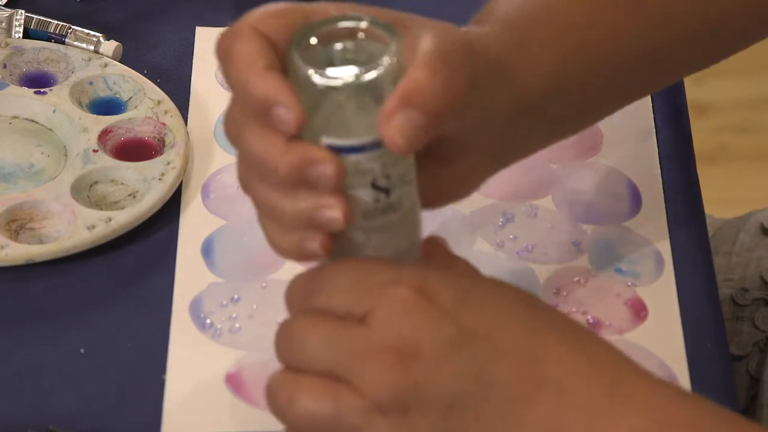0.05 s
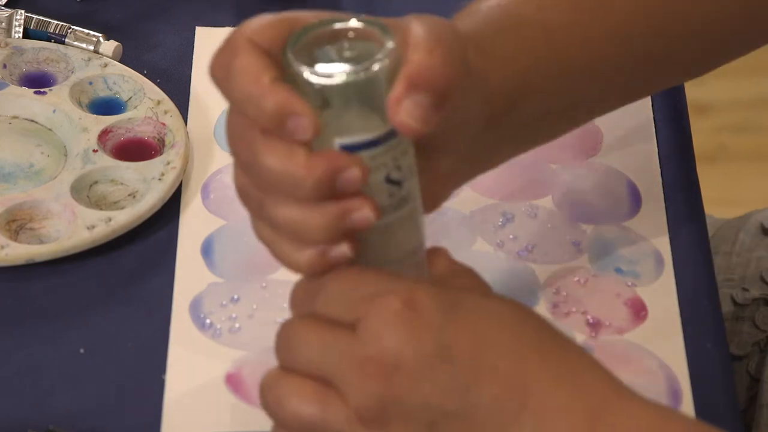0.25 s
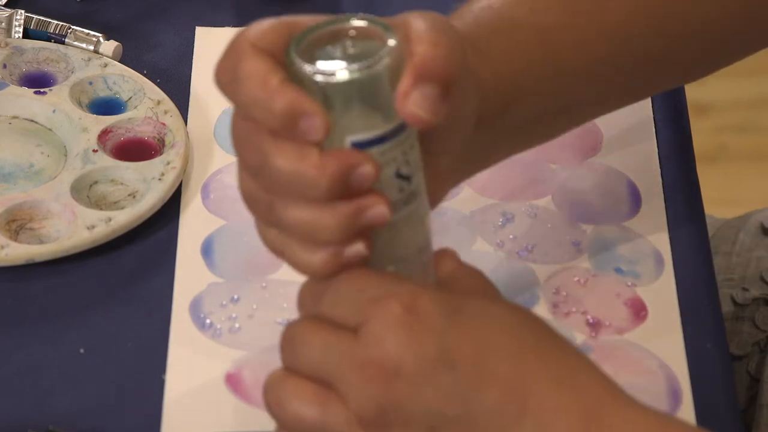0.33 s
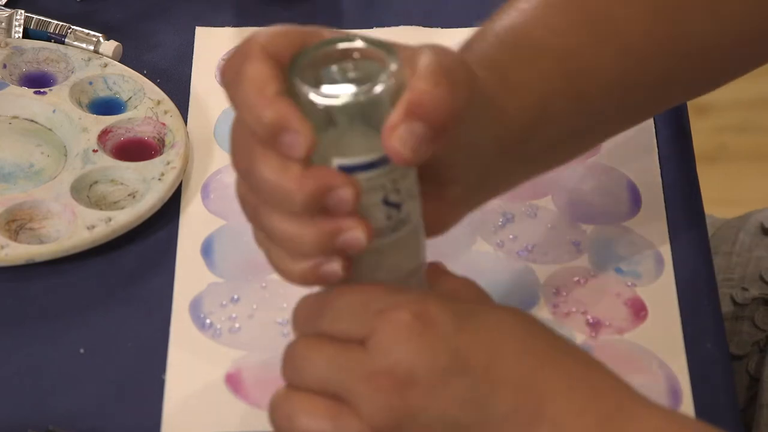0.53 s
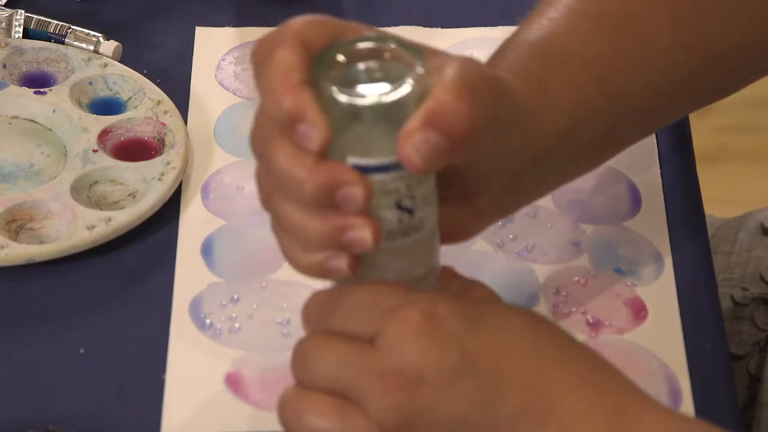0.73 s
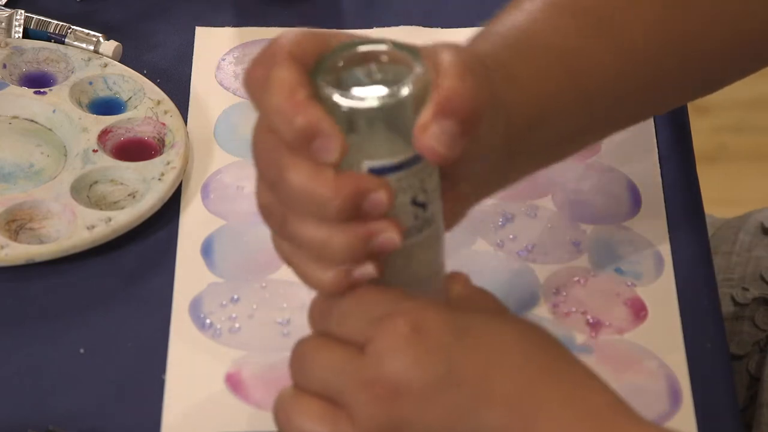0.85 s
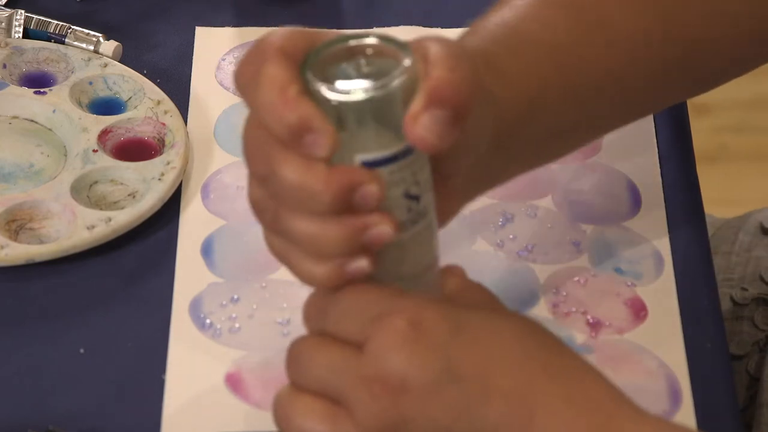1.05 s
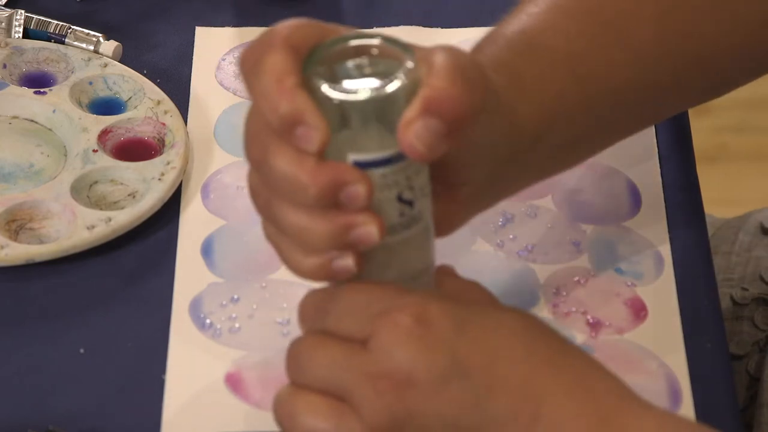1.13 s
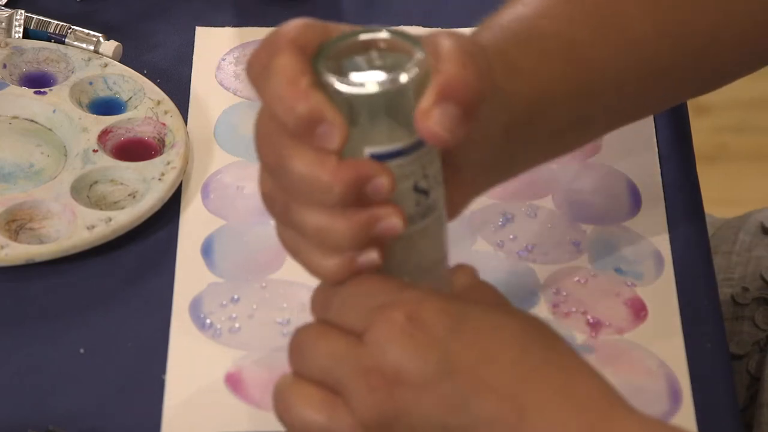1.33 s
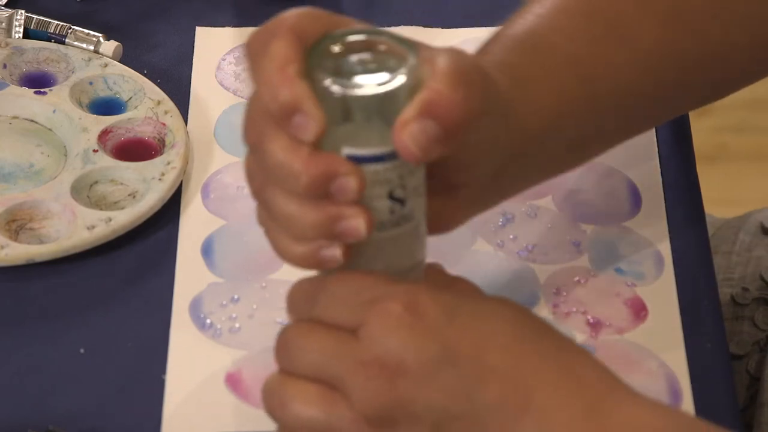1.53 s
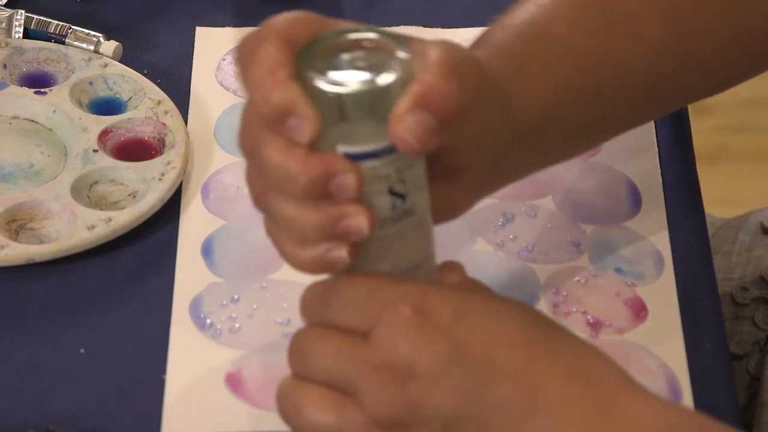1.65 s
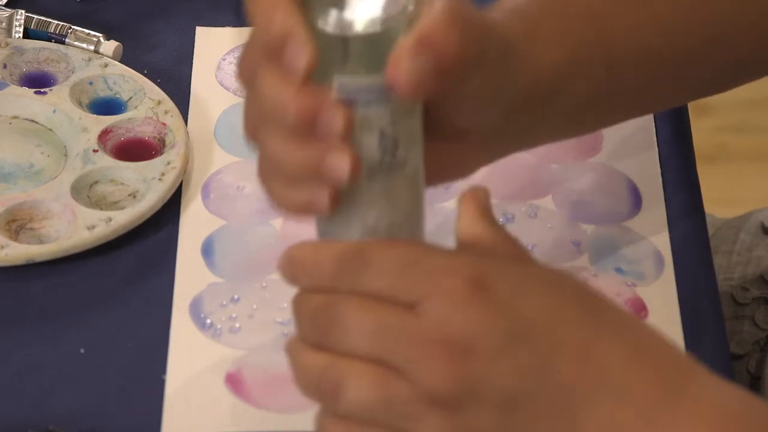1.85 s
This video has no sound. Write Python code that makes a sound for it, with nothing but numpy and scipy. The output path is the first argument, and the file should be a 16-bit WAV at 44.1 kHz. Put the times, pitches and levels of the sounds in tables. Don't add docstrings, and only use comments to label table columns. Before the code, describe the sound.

Salt crystals crack sharply in five twists of a hand-held grinder, each trailing a soft hiss

```python
import sys
import numpy as np
from scipy import signal
from scipy.fft import rfft, irfft
from scipy.io import wavfile
from scipy.ndimage import uniform_filter1d

SR = 44100
rng = np.random.default_rng(int(sys.argv[2]) if len(sys.argv) > 2 else 0)


def nominal_scale(level):
    x = np.asarray(level, float) / 20
    return 10 ** x


def materialize(psi):
    bounded = np.clip(np.atleast_2d(psi).T, -1, 1)
    quanta = np.round(bounded * 32767).astype(np.int16)
    wavfile.write(sys.argv[1], SR, quanta)


N = 83790


def evened(x):
    return x / np.sqrt(np.mean(x ** 2) + 1e-20)


def read(points, hz):
    table_hz, value = np.transpose(points)
    return np.interp(np.log(hz + 1), np.log(table_hz + 1), value)


def add(mix, start_s, sound):
    part = mix[round(start_s * SR):][:len(sound)]
    part += sound[:len(part)]


def ring(x, hz, width_hz):
    radius = np.exp(-np.pi * width_hz / SR)
    pole = radius * np.exp(2j * np.pi * hz / SR)
    return 2 * signal.lfilter([1 - radius], [1, -pole], x).real


def ring_twice(x, hz, width_hz):
    return evened(ring(ring(x, hz, width_hz), hz, width_hz))


# frequency in Hz, width in Hz, level in dB.
TUBE_MODES = [(2150, 700, -8), (3300, 900, -7), (4700, 900, -4), (6000, 900, -7), (7050, 900, -8),
              (8140, 800, -4), (10200, 600, -.5), (12600, 900, -3), (14800, 900, -8)]


def crack(peak_db, hz, length_s, body_db, wall_db, chance):
    own_db, own_q, splinter_db = -3, 6, 2
    focus_db, focus_octaves = -6, 1.1
    t = np.arange(len(chance)) / SR
    splinters = chance[:, 0] * nominal_scale(splinter_db * np.repeat(chance[::20, 1], 20))
    burst = splinters * np.minimum(t / 0.0005, 1) * np.exp(-(t / length_s) ** 1.2)

    out = nominal_scale(own_db) * ring_twice(burst, hz, hz / own_q + 900)
    for mode_hz, width_hz, mode_db in TUBE_MODES:
        distance = (np.log2(mode_hz / hz) / focus_octaves) ** 2
        distance = min(distance, 4 if mode_hz > hz else 3.2)
        out += nominal_scale(mode_db + focus_db * distance) * ring_twice(burst, mode_hz, 2 * width_hz)

    out = evened(out)
    out += nominal_scale(body_db) * ring_twice(burst, 800, 1400)
    out += nominal_scale(wall_db) * ring_twice(burst, 2500, 1700)
    return nominal_scale(peak_db - 6) * evened(out) * np.sqrt((length_s + 0.0004) / t[-1])


# peak in dB, brightest Hz, length in seconds, dull body in dB, wall ring in dB.
CRACKS = [(-13.5, 11800, 0.0016, -11, -4), (-12, 11500, 0.0017, -17.5, -10), (-19, 5900, 0.00042, 3, 1),
          (-9, 7700, 0.0011, -10.5, -11), (-16.5, 8800, .0009, -29, -5.5), (-22, 12000, 0.00087, -31, -8),
          (-13, 9900, 0.00085, -28, -19), (-14, 11000, 0.00091, -31, -29), (-24, 12500, 0.0011, -24, -17),
          (-20, 9000, 0.0018, -31, -18), (-12, 9800, 0.0011, -31, -48), (-13.5, 4600, 0.0011, -21, -14),
          (-17.5, 11800, .0015, -34, -18.5), (-20.5, 4270, 0.00081, -19, -18),
          (-20.5, 4700, 0.00099, -19, -13), (-20, 11000, 0.0024, -26, -18),
          (-18.5, 5020, 0.00072, -5.5, -9.5), (-21, 9100, 0.00097, -3, -3.5),
          (-18.5, 7000, 0.00081, -35, -16), (-15.5, 4950, 0.0011, -27, -19.5),
          (-21.5, 4700, 0.0009, -26, -25), (-15, 9300, 0.0011, -5.5, -15), (-9, 8000, 0.00084, -10, -27),
          (-13.5, 11500, .001, -25, -42)]
CRACK_S = [0.2136, 0.2553, 0.2603, 0.2643, 0.2849, 0.3046, 0.5531, 0.5568, 0.5923, 0.596, 0.5986, 0.6044,
           0.9049, 0.9359, 0.9954, 1.1233, 1.153, 1.1647, 1.1901, 1.1978, 1.5709, 1.5888, 1.5911, 1.6027]
# peak in dB, brightest Hz.
CHIPS = [(-47, 11800), (-27.5, 4170), (-38, 13000), (-33, 9700), (-31, 5200), (-24.5, 7100), (-22, 3000),
         (-25, 10400), (-29.5, 3300), (-30, 8000), (-39, 2400), (-26, 9200), (-24, 2800), (-33.5, 1630),
         (-41, 7600), (-30.5, 2800), (-29.5, 2050), (-15.5, 10300), (-32, 10200), (-31, 3400), (-39, 9900),
         (-43, 4100), (-36, 15100), (-33, 3600), (-29, 10000), (-33, 4500), (-22.5, 8400),
              (-31, 10400), (-32.5, 3600), (-44, 3200), (-27, 3660), (-30, 1700), (-49, 7100),
              (-30.5, 4700), (-38, 8000), (-28.5, 1500), (-36, 4600), (-27, 4140), (-34.5, 2600),
              (-27.5, 2900), (-37, 9200), (-23, 10500),
         (-29, 1970), (-38, 12000), (-51, 12000), (-40, 3300), (-43, 3700), (-33, 11500), (-38, 11000),
         (-40, 7500), (-31, 3400), (-47, 2600), (-41, 2200), (-48, 2930), (-27.5, 2000), (-35, 10200),
         (-46, 12700), (-33, 9500), (-18, 13600), (-21, 5800), (-21.5, 3200), (-27, 14000), (-29, 3700),
         (-22, 8600), (-22.5, 12500), (-23, 10200), (-21.5, 1300), (-20, 4700)]
CHIP_S = [0.1, 0.1212, 0.1571, 0.1724, 0.223, 0.2525, 0.277, 0.2802, 0.298, 0.3105, 0.3398, 0.3456, 0.3539,
          0.3796, 0.4188, 0.5012, 0.5135, 0.5541, 0.6114, 0.6346, 0.8311]
LATE_CHIP_S = [0.8417, 0.9625, 0.9716, 0.9804, 0.9838, 0.9889, 0.9916, 1.014, 1.0983, 1.109, 1.1286, 1.2238,
               1.2367, 1.283, 1.3607, 1.3687, 1.5316, 1.5402, 1.5454, 1.554, 1.5997]
MORE_CHIP_S = [.1213, .1283, .14, .1685, .21, .2495, .5805, .917, .9238, .9265, .943, .9456, 1.5317, 1.539,
               1.5755, 1.617, 1.199, .2142, .285, .354, .9052, .9362, .9958, 1.1535, 1.589, 1.5902]


def crystals():
    fizz_db, fizz_s = -24.5, 0.0025
    wash_db, wash_t60_s = -18, 0.061
    chip_length_s, chip_body_db, chip_wall_db = 0.0008, -22, -25

    breaks = [(s, *row) for s, row in zip(CRACK_S, CRACKS)]
    small_s = CHIP_S + LATE_CHIP_S + MORE_CHIP_S
    for s, row in zip(small_s, CHIPS):
        breaks.append((s, *row, chip_length_s, chip_body_db, chip_wall_db))
    out = np.zeros(N)
    for start_s, *settings in breaks:
        chance = rng.standard_normal((600, 2))
        add(out, start_s - 0.0003, crack(*settings, chance))

    t = np.arange(8000) / SR
    fizz = rng.standard_normal(800) * np.exp(-t[799::-1] / fizz_s)
    fizz /= np.linalg.norm(fizz)
    out = out + nominal_scale(fizz_db) * signal.fftconvolve(out, fizz)[799:]
    wash = rng.standard_normal(8000) * nominal_scale(-60 * t / wash_t60_s) * np.minimum(t / 0.00083, 1)
    wash /= np.linalg.norm(wash)
    return out + nominal_scale(wash_db) * signal.fftconvolve(out, wash)[:N]


# start in seconds, level in dB, recoil share.
JOLTS = [(.121, -39, 0), (.2135, -22, .45), (.255, -22, .5), (.264, -26, .9), (.279, -36, 0),
         (.285, -36, 0), (.353, -44, 0), (.553, -25, 0), (.592, -31, 0), (.598, -29, 0), (.604, -34, 0),
         (.905, -30, .3), (.9355, -35, 0), (.9955, -39, .7), (1.123, -32, .2), (1.153, -32, .2),
         (1.165, -44, .8), (1.19, -33, 0), (1.198, -29, 0), (1.531, -44, .1), (1.571, -38, 0),
         (1.5888, -19.5, .9), (1.6025, -44, 1)]


def jolts():
    recoil_s, push_s, low_cut_hz = 0.0011, 0.012, 22
    back = np.arange(0, recoil_s, 1 / SR) / recoil_s
    fore = np.arange(0, push_s, 1 / SR) / push_s
    out = np.zeros(N)
    for start_s, db, recoil in JOLTS:
        sharpness = 0.66 - 0.32 * min(2 * recoil, 1)
        pull = -recoil * np.sin(np.pi * back)
        push = np.sin(np.pi * fore ** sharpness) ** 2
        add(out, start_s, nominal_scale(db) * np.r_[pull, push])
    return signal.sosfilt(signal.butter(4, low_cut_hz, "high", fs=SR, output="sos"), out)


def hiss(gain, patch_db):
    frames = N // 64 + 5
    real, imag, patches = rng.standard_normal((frames, 129, 3)).T
    patches = evened(uniform_filter1d(uniform_filter1d(patches, 10, 0), 6, 1))
    hz = np.fft.rfftfreq(256, 1 / SR)[:, None]
    t = np.arange(frames) * 64 / SR
    z = (real + 1j * imag) * nominal_scale(patch_db * patches) * gain(hz, t)
    return signal.istft(z, nperseg=256, noverlap=192)[1][:N]


# start in seconds, level in dB, rise in seconds, t60 in seconds, low band in dB.
SLIDES = [(.12, -47.5, 0.043, 1.1, 5.5), (.213, -40.5, 0.0042, 0.46, 10), (.262, -36.5, 0.013, 2.03, 2),
          (.339, -44, 0.048, 1.1, 6), (.555, -45, .0078, 2.1, 7), (.6, -40, 0.014, 1.9, -3.5),
          (.88, -44, 0.012, 0.7, 0), (.905, -46, .0059, 1.3, -4), (.975, -45, .0073, 1.6, 1),
          (1.125, -43.5, 0.013, 2, 2), (1.158, -53, .0056, 1.1, 2), (1.2, -42, 0.03, 1.46, 4),
          (1.36, -40.5, 0.0062, 0.31, -12), (1.534, -40, .0087, .3, 3), (1.552, -42, 0.0037, .1, 4),
          (1.606, -35.5, .014, 1.83, -7.5)]
# frequency in Hz, level in dB per Hz.
SLIDE_SPECTRUM = [(880, -13.5), (1500, -12), (1540, -12.5), (2310, -10), (2570, -11), (2780, -6.5),
                  (5290, -3.5), (11800, -3.5), (15500, -4)]
# frequency in Hz, share of t60.
DECAY_SHARE = [(1000, 1.32), (5000, 0.77), (10000, 0.54), (16000, 0.15)]


def slides():
    low_band_hz = 3435

    def gain(hz, t):
        power = 0
        for start_s, db, rise_s, t60_s, low_db in SLIDES:
            swell = np.clip((t - start_s) / rise_s, 0, 1) ** 2
            tilt_db = low_db / (1 + (hz / low_band_hz) ** 10)
            decay_db = 60 * np.maximum(t - start_s, 0) / (t60_s * read(DECAY_SHARE, hz))
            power = power + swell * nominal_scale(db + tilt_db - decay_db) ** 2
        shape = nominal_scale(read(SLIDE_SPECTRUM, hz)) * (hz > 300)
        return np.sqrt(power) * shape / np.linalg.norm(shape)

    return 0.83 * hiss(gain, patch_db=1.5)


# start in seconds, length in seconds, level in dB, slips per second.
CREAKS = [
    (0.267, .14, -49, 535),
    (0.485, 0.051, -59, 250),
    (0.61, .1, -53, 285),
    (0.867, 0.05, -49, 350),
    (0.905, 0.12, -50.5, 230),
    (1.105, .11, -61, 400),
    (1.346, 0.089, -59, 500),
    (1.524, 0.043, -53.5, 240),
]
# frequency in Hz, width in Hz, level in dB.
BURR_MODES = [(536, 2100, -5), (1060, 1600, 2), (2330, 1900, 12.5), (4090, 1000, 13.5)]


def creaks():
    rate_hz, level, t = np.full(N, 300.0), np.zeros(N), np.arange(N) / SR
    for start_s, length_s, db, slips_per_s in CREAKS:
        end_s = start_s + length_s
        on = (t > start_s) & (t < end_s)
        rate_hz[on] = slips_per_s
        edge_s = np.minimum(t[on] - start_s, end_s - t[on])
        level[on] = nominal_scale(db) * np.clip(edge_s / 0.011, 0, 1)

    wobble = evened(uniform_filter1d(rng.standard_normal(N), 150))
    phase = np.cumsum(rate_hz * np.exp(0.35 * wobble)) / SR
    slips = np.diff(np.floor(phase), prepend=0)
    scrape = signal.lfilter([1], [1, -0.7], slips) * (1 + 1.02 * rng.standard_normal(N))
    rung = sum(nominal_scale(db) * ring(ring(scrape, hz, width), hz, width) for hz, width, db in BURR_MODES)
    return evened(rung) * level


# frequency in Hz, level in dB per Hz.
ROOM_SPECTRUM = [(59, -39), (100, -4), (335, -7), (513, -10), (691, -8), (2800, -12.5), (15000, -17.5),
                 (16000, -24)]


def room():
    tone_db, rumble_db = -65, -69
    grip_s, grip_db = 0.12, 6
    hz = np.fft.rfftfreq(N, 1 / SR)
    spectrum = rfft(rng.standard_normal(N)) * nominal_scale(read(ROOM_SPECTRUM, hz))
    tone = evened(irfft(spectrum, N))
    rumble = ring_twice(rng.standard_normal(N), 54, 63)
    grip = nominal_scale(grip_db * np.clip((np.arange(N) / SR - grip_s) / 0.039, 0, 1))
    return grip * (nominal_scale(tone_db) * tone + nominal_scale(rumble_db) * rumble)


def scene():
    return (crystals() + jolts() + slides() + creaks() + room())[None]


def low_pass(x):
    return signal.sosfilt(signal.butter(12, 17150, fs=SR, output="sos"), x)


def record(dry):
    edge_hz = 15850
    taps = signal.firwin(301, edge_hz, window=("kaiser", 4), fs=SR)
    mix = signal.oaconvolve(dry, taps[None], "same")
    return low_pass(mix)


dry = scene()
out = record(dry)
materialize(out)
```